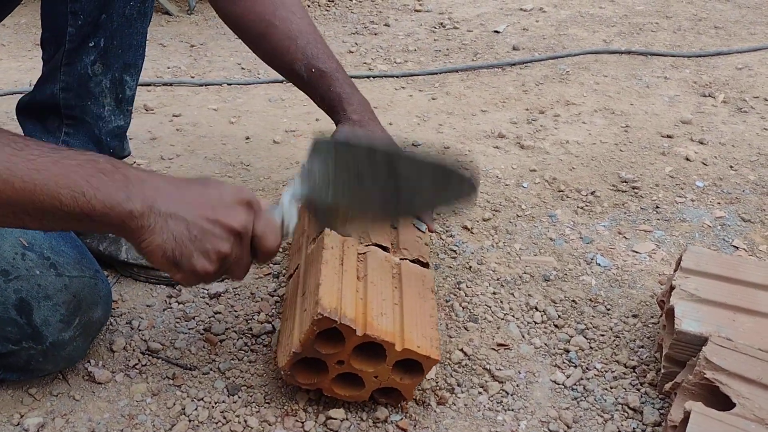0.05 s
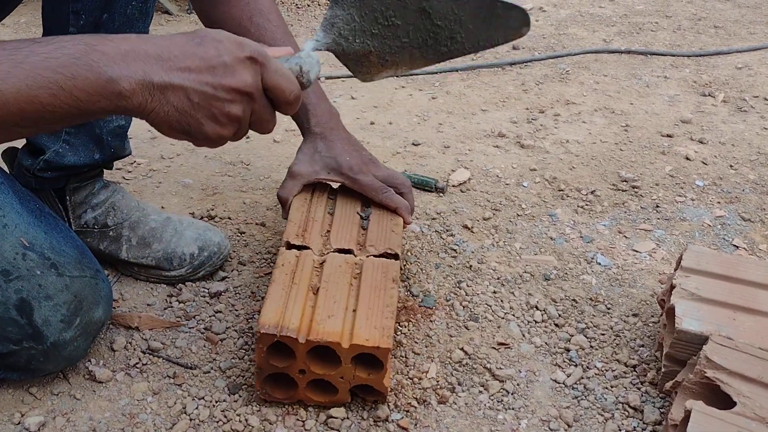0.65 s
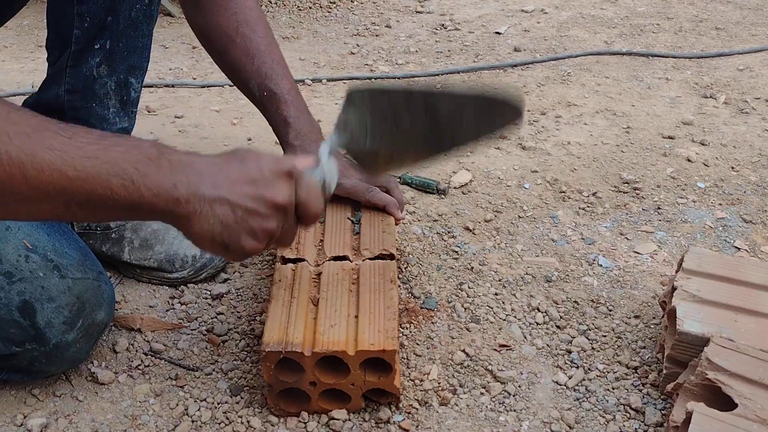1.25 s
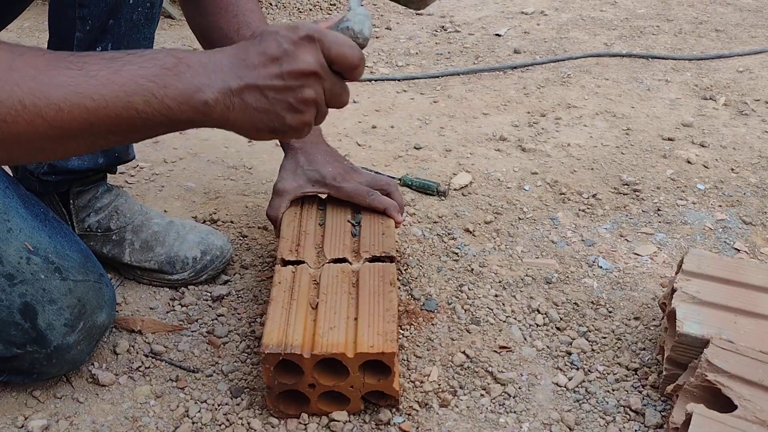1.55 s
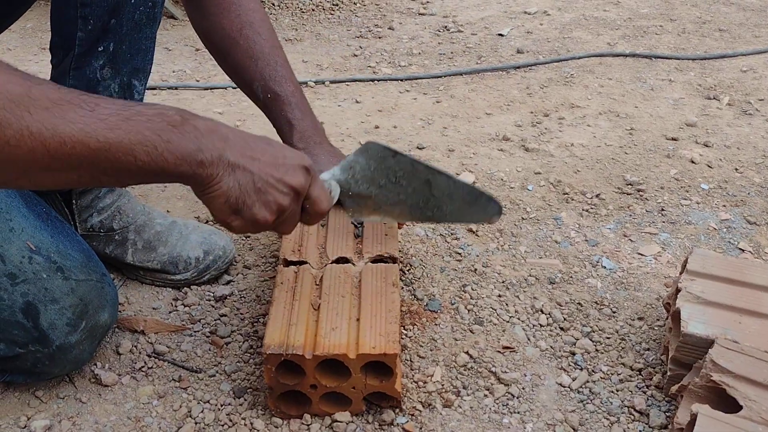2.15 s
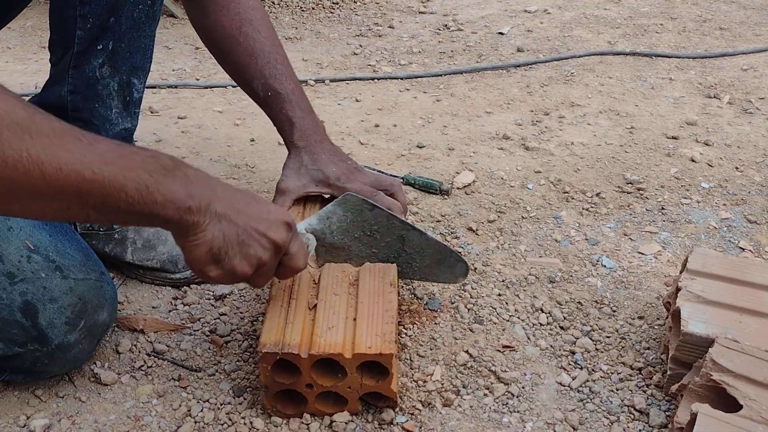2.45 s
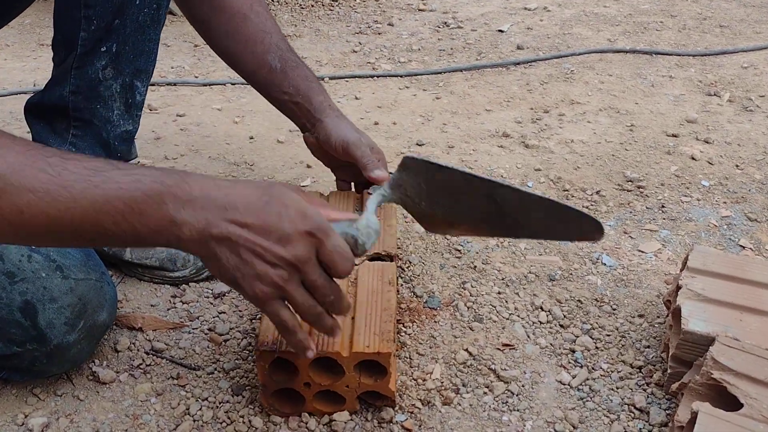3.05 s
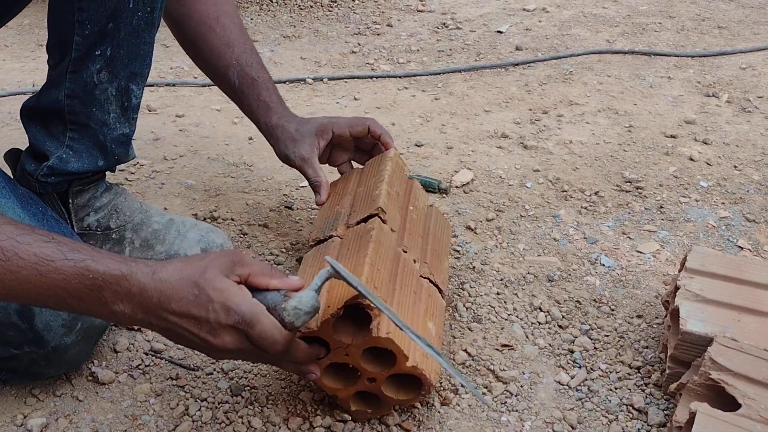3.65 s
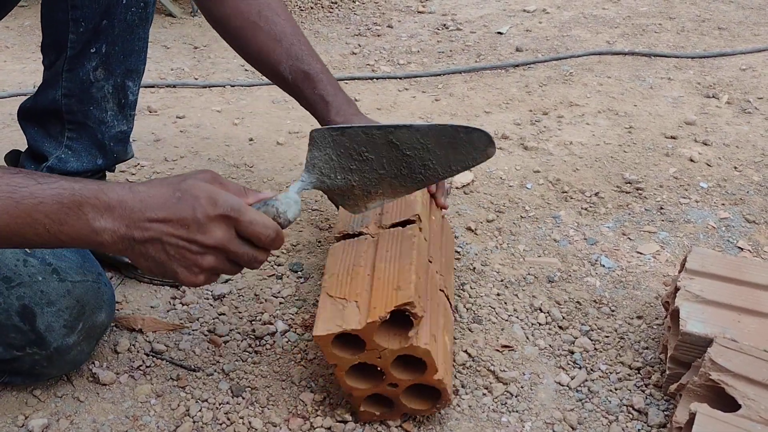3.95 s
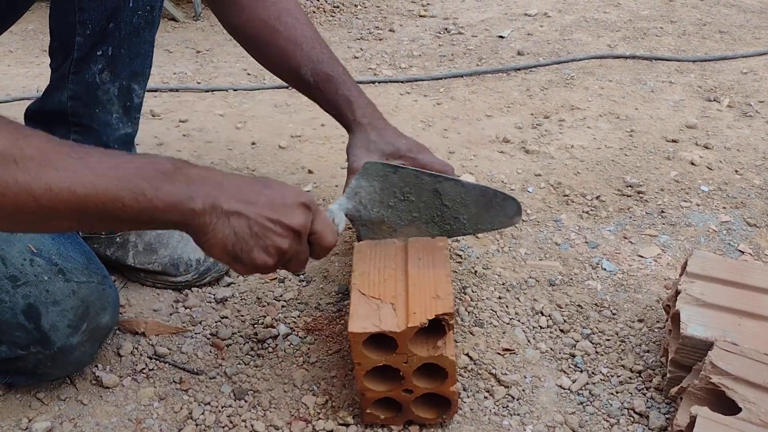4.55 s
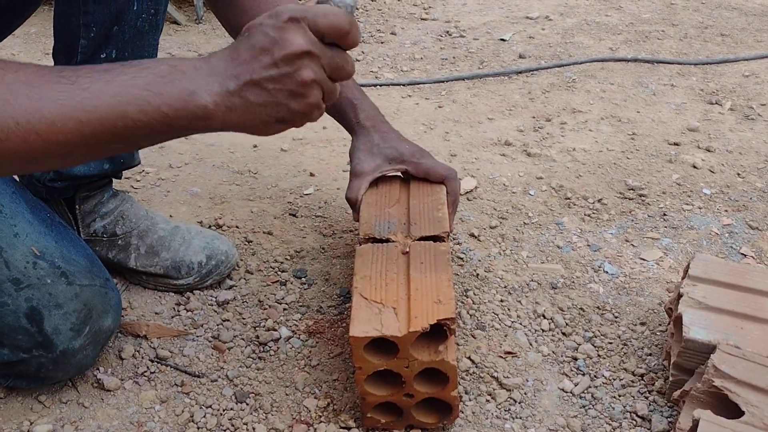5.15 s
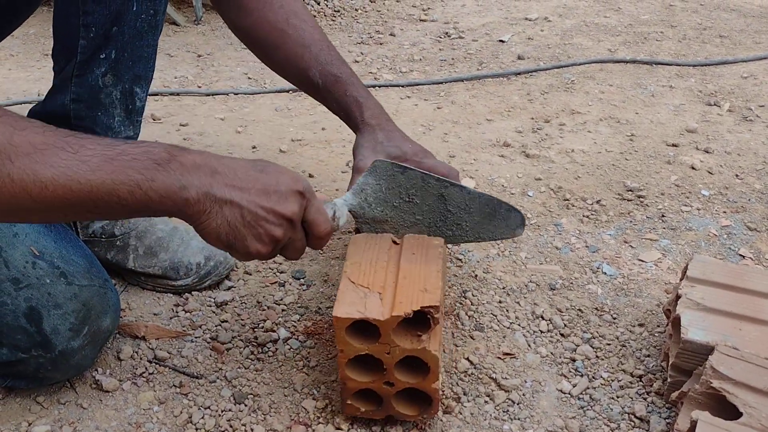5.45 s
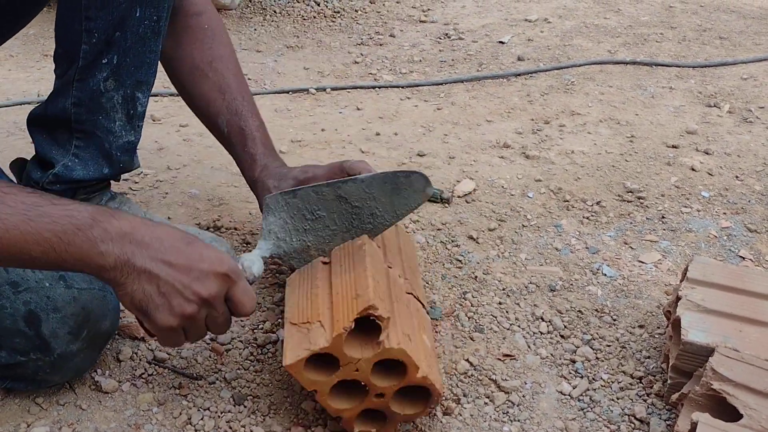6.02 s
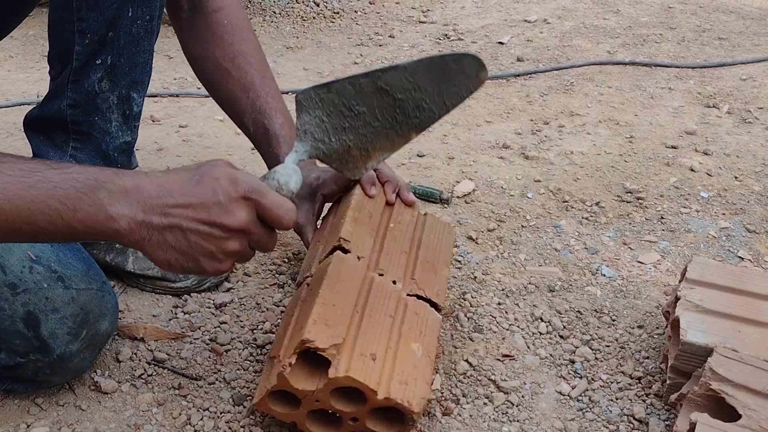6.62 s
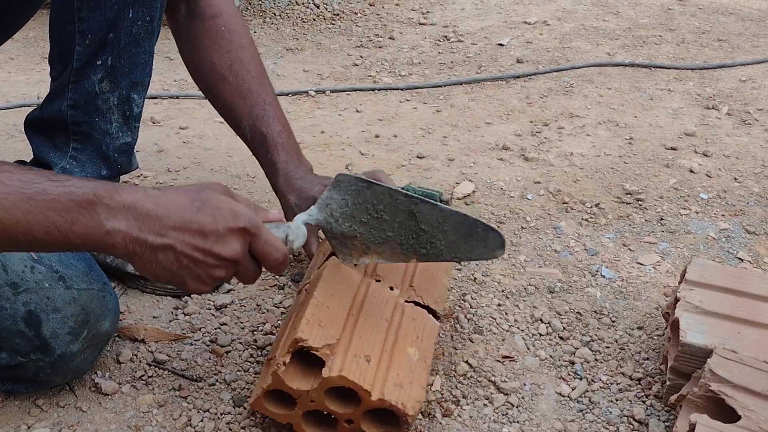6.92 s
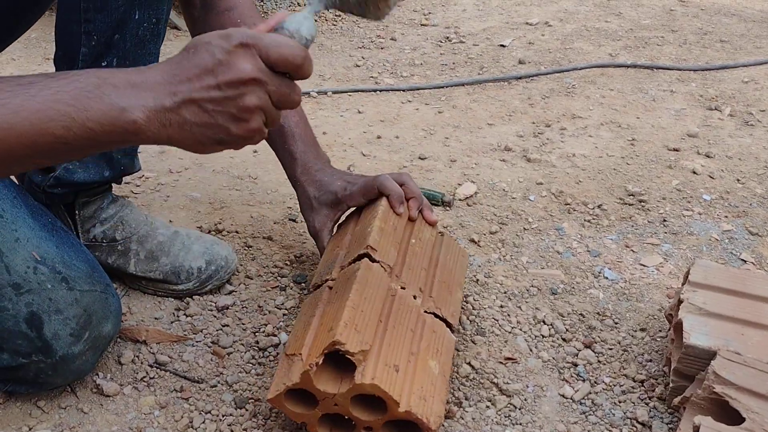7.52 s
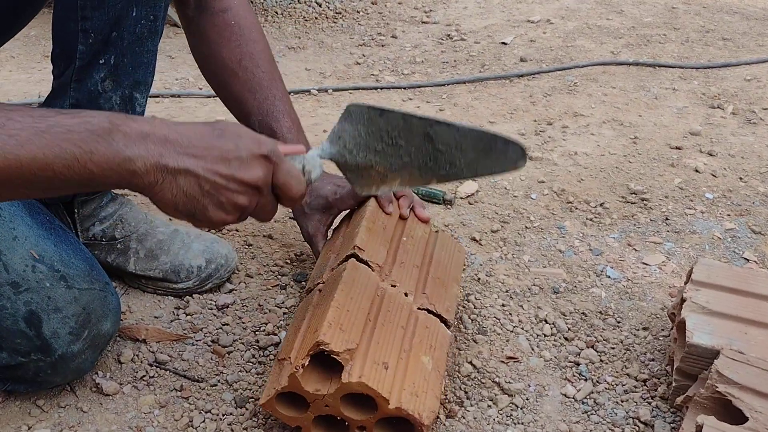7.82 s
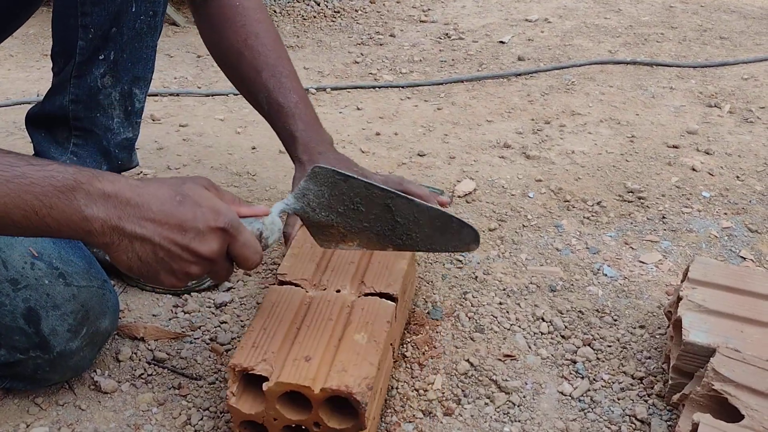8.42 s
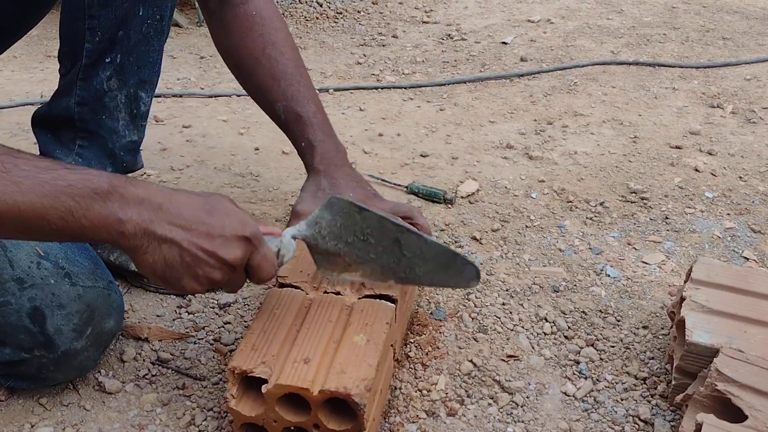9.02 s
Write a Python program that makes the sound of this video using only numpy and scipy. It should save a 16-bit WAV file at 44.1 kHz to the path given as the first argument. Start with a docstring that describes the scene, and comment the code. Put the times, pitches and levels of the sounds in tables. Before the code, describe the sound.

A steel trowel chops at a hollow clay brick in sharp, ringing knocks, with gritty scrapes between rounds, close by outdoors.

```python
"""Sharp, ringing chops of a steel trowel's edge on a hollow clay brick, outdoors, close to a small
stereo microphone. Each blow crushes a little clay, knocks the brick's walls, rings the blade and throws
crumbs; the yard and a far wall answer faintly. Between rounds the mason turns the brick over on gritty
ground. A few blows overload the microphone. Behind it all lie a distant rumble, hiss and thin tones."""
import sys
import numpy as np
from scipy import signal
from scipy.fft import rfft, irfft, next_fast_len
from scipy.io import wavfile
from scipy.ndimage import uniform_filter1d

SR = 44100
rng = np.random.default_rng(int(sys.argv[2]) if len(sys.argv) > 2 else 0)


def to_wav(s):
    """Save 16-bit WAV."""
    ch = np.atleast_2d(s).T  # columns
    pcm = np.round(np.clip(ch, -1, 1) * 32767)  # PCM
    wavfile.write(sys.argv[1], SR, pcm.astype(np.int16))


N = 408807
T = np.arange(SR // 2) / SR  # time axis of one hit
STRIKE_SAMPLES = 1800

# trowel blows and light touches: start_s, knock_db, low_tone_hz, low_tone_db, lower_wall_hz, lower_wall_db,
# upper_wall_hz, upper_wall_db, bite_db, ring_db, clink_hz, clink_db, crush_s
TROWEL_BLOWS = [(0.1643, -40, 419, -39, 1418, -28.5, 1855, -24, -26, -38, 8600, -39, 0.0027),
                (0.429, -63, 436, -72, 1440, -61, 1545, -50.5, -48.5, -60, 7560, -46, 0.0044),
                (0.575, -57, 640, -55, 1100, -55.5, 1980, -56, -52, -43.5, 9370, -45, 0.012),
                (1.0162, -44, 415, -48, 1373, -40, 2130, -32.5, -36, -30.5, 7500, -33.5, 0.0039),
                (1.4037, -35.5, 919, -41, 1410, -32, 1940, -22, -28.5, -31.5, 3780, -25, 0.0041),
                (1.7837, -42.5, 438, -40.5, 1406, -30.5, 1866, -26.5, -26.5, -31, 4820, -37, 0.0024),
                (2.166, -31.5, 435, -35.5, 1176, -37.5, 2034, -26, -28, -28, 3780, -33, 0.0046),
                (2.525, -43, 894, -56, 1183, -30, 1872, -29.5, -29, -45, 9500, -39, 0.0055),
                (2.8852, -32, 429, -40, 1350, -26.5, 1850, -24.5, -29.5, -35, 5850, -32, 0.0083),
                (4.229, -54.5, 800, -51.5, 954, -60, 1987, -43.5, -42, -40, 8360, -40, 0.0044),
                (4.2694, -60, 855, -58, 1023, -62, 1985, -65, -57.5, -59.5, 3320, -56, 0.0043),
                (4.6074, -37.5, 440, -43, 1146, -25.5, 2116, -26.5, -28.5, -33, 4640, -25.5, 0.0023),
                (4.991, -37, 827, -33, 1158, -26, 1747, -23, -29.5, -38.5, 3600, -34, 0.0063),
                (5.375, -36, 836, -34.5, 1213, -32.5, 1814, -22.5, -30.5, -36, 4660, -38, 0.0051),
                (6.4161, -55, 420, -53, 1400, -50, 2090, -49.5, -41.5, -42, 4720, -24.5, 0.0058),
                (6.9187, -45, 433, -38.5, 870, -45, 2310, -49, -51, -37, 3790, -45, 0.0037),
                (6.944, -53.5, 433, -49, 987, -56, 1934, -50, -55.5, -58, 8800, -53, .0033),
                (7.401, -35, 435, -41, 1380, -30, 2050, -29.5, -23.5, -28.5, 9100, -26, 0.0081),
                (7.7973, -39, 840, -48, 1433, -30.5, 2046, -29.5, -26.5, -31.5, 3720, -27, 0.0084),
                (8.1716, -32.5, 807, -53, 1084, -25, 1694, -25, -29, -28.5, 8130, -25, 0.006),
                (8.211, -52, 840, -65, 1210, -47, 1510, -41.5, -46, -66, 7500, -47, 0.01),
                (8.645, -40, 842, -38, 619, -28.5, 1927, -32, -38.5, -35.5, 3290, -33.5, .006),
                (9.0579, -44, 426, -51.5, 1003, -41.5, 1933, -40, -30.5, -43.5, 9700, -43, 0.0036)]
# modes of the steel blade: pitch_hz, level_db, t60_s
BLADE_MODES = [(436, -18, 0.28), (883, -19.5, .17), (1084, -14.5, 0.12), (1420, -17.5, .18),
               (1970, 4.5, .15), (2050, -16, 0.39), (2262, -10, 0.12), (2802, -19, 0.13), (3244, -21, .14),
               (3630, -19.5, 0.17), (3780, -17.5, 0.29), (4330, -22.5, 0.11), (4920, -12.5, 0.086),
               (5950, -19.5, 0.12), (5860, -18, 0.13), (7950, -19.5, 0.12), (8100, -17, .08),
               (8200, -18.5, .1), (9370, -19, 0.082), (9700, -17.5, .1), (9900, -17.5, 0.13)]
# spectra of a blow (knock, two groups of wall modes, crack and fizz of the clay): frequency_hz, gain_db
KNOCK_COLOUR = [(40, -21), (90, 4.5), (170, -6), (250, -1), (340, -5), (450, -2), (620, -0.5), (820, -3.5),
                (1100, -24)]
LOWER_WALL_COLOUR = [(600, -37), (850, -14.5), (1050, -2), (1400, -4.5), (1550, -7), (1900, -40.5)]
UPPER_WALL_COLOUR = [(1200, -37.5), (1480, -9), (1650, -5), (2000, -1), (2170, -18.5), (2300, -4),
                     (2500, -22), (3200, -29.5)]
CRACK_COLOUR = [(1500, -32), (2400, -3.5), (2700, -6.5), (3600, 1.5), (4200, 0.5), (4750, 4), (5300, -0.5),
                (6000, 1.5), (7500, -17.5)]
FIZZ_COLOUR = [(4500, -29), (6100, -2.5), (7300, 3), (8500, 4.5), (10000, 1), (11700, -0.5), (12500, -9),
               (13500, -4), (15700, -11.5), (17000, -24)]
# the loudest chips and pebbles clicking: start_s, tick_db, body_db, left_over_right_db
CHIP_CLICKS = [(0.4607, -53, -57.5, -1), (0.5189, -59, -58.5, 3), (0.555, -60, -53, 2),
               (0.838, -79, -60, -1), (2.0798, -68, -59, -3), (2.3085, -65.5, -67, -8),
               (2.6045, -55.5, -49.5, -1), (3.6712, -47, -41, -1), (4.1185, -55, -59.5, -6.5),
               (5.0683, -47.5, -48, -3), (5.632, -50, -61, -2.5), (5.7104, -59, -56.5, -1),
               (5.8112, -46.5, -49.5, -1.5), (5.9447, -58, -60, -2), (5.9799, -51.5, -55, 2),
               (6.3296, -54, -59, -2), (6.3605, -45, -50, 0), (6.7964, -58, -55.5, 2),
               (7.4823, -50.5, -54.5, -9), (8.331, -47.5, -52, 1), (8.3552, -44, -49, 0.5)]
# the brick rocks or is shoved over grit: peak_s, swell_s, fade_s, grit_db, body_db
BRICK_SHOVES = [(0.215, 0.031, 0.16, -48.5, -40), (1.46, 0.036, .13, -51.5, -48),
                (0.436, 0.033, .08, -50, -50), (0.577, .08, 0.056, -53, -46), (0.97, 0.2, 0.059, -67, -62),
                (3.41, 0.32, 0.16, -68, -55.5), (3.6, 0.23, 0.17, -60.5, -66.5),
                (3.685, 0.051, 0.15, -44.5, -47), (4.13, .15, 0.11, -59.5, -58.5),
                (5.63, 0.049, 0.054, -53.5, -49.5), (5.775, 0.098, 0.037, -55, -50.5),
                (5.891, 0.034, 0.03, -58, -50.5), (6.085, .12, 0.048, -54, -48.5),
                (6.125, .03, .06, -48, -45), (6.18, .04, .08, -52, -45.5), (6.252, .03, 0.056, -49, -51),
                (6.406, .13, 0.069, -44, -41.5), (6.6, 0.16, 0.28, -59, -59.5),
                (6.809, .15, 0.15, -55.5, -56.5), (7.025, .03, .07, -61, -59),
                (8.42, 0.16, 0.14, -54.5, -53), (8.505, 0.043, 0.11, -53.5, -64)]
# spectra of a chip's tick, the clay body and rubbing grit: frequency_hz, gain_db
TICK_COLOUR = [(1500, -42), (3000, -9), (4500, -0.5), (6500, -5), (8400, 2.5), (11000, -1.5),
               (13000, -13.5), (16000, -11)]
CLAY_COLOUR = [(300, -6.5), (700, -11.5), (1100, -8.5), (1600, -2.5), (2000, -4), (2600, -9.5),
               (4000, -18.5)]
GRIT_COLOUR = [(1290, -32), (2200, -1.5), (2970, -7.5), (3220, 2.5), (4380, -7.5), (6420, -0.5), (8580, 0),
               (12700, -4), (14800, -6), (16000, -35)]
# the brick drops on to its side: start_s, level_db, pitch_hz, t60_s
BRICK_DROPS = [(3.67, -31.5, 109, 0.19), (5.633, -39.5, 123, 0.2)]
# slow swings of the overloaded microphone: start_s, left_db
MIC_SWINGS = [(0.165, -30), (1.403, -29), (1.786, -31), (4.606, -35.5), (4.993, -34), (9.057, -28.5)]
# a soft low pop in the microphone: start_s, left_db, right_db
MIC_POPS = [(9.141, -20, -37)]
# the two microphone ports hear less alike towards the treble: frequency_hz, likeness (-1 to 1)
PORT_LIKENESS = [(30, .8), (80, .95), (180, .94), (350, .92), (700, .9), (1400, .85), (2500, .55),
                 (5000, .3), (9000, .1), (16000, .05)]
# how much more the left port hears: frequency_hz, left_over_right_db
PORT_TILT = [(100, -1.5), (500, -0.9), (1200, 1.64), (2200, 2.04), (4300, 0.2), (8000, -1.3), (13000, 1.85)]
# decay of the reflections from the yard nearby and from the far wall: frequency_hz, t60_s
YARD_DECAY = [(100, 0.87), (500, 0.29), (1500, 0.19), (4000, .24), (9000, 0.18), (16000, 0.2)]
FAR_WALL_DECAY = [(100, 0.44), (500, 0.5), (1800, .45), (4000, 0.25), (9000, 0.38), (16000, 0.97)]
# the far wall gives back less of the top treble: frequency_hz, gain_db
FAR_WALL_COLOUR = [(100, -1), (2000, 1), (5000, 2.5), (12000, -8)]
# faint tones from far away: start_s, length_s, pitch_hz, level_db
DISTANT_TONES = [(0.292, 0.25, 580, -56), (2.277, 0.23, 620, -65.5), (5.976, 0.35, 630, -61.5),
                 (6.544, 0.37, 650, -61)]
# spectrum of the open air: frequency_hz, gain_db
AIR_COLOUR = [(12, -24), (20, 1.5), (104, -1.5), (277, -21), (377, -23.5), (624, -20.5), (949, -28.5),
              (1090, -24), (1290, -33.5), (1960, -32.5), (2670, -38), (5680, -42.5), (11100, -41),
              (14700, -43), (16000, -49.5)]
# swell of the distant rumble, taken about its mean: time_s, level_db
RUMBLE_SWELL = [(0.0, -54.5), (1.36, -56.5), (1.61, -51), (2.19, -55), (2.37, -50), (2.6, -50), (2.7, -53),
                (4.26, -58), (4.46, -55), (4.96, -55), (5.27, -50.5), (7.11, -56.5), (8.17, -50.5),
                (8.47, -51.5), (8.8, -56.5), (9.05, -57.5)]


def trowel_blow(knock_db, low_tone_hz, low_tone_db, lower_hz, lower_db, upper_hz, upper_db,
                bite_db, ring_db, clink_hz, clink_db, crush_s):
    """Clay crushes under the edge while the brick's walls ring and the blade rings, with a low tone of its own."""
    bite, crumbling = crushing(crush_s), amp(-13) * onset(0.00097)
    # a glancing blow (much bite, little wall ring) fizzes more and cracks less
    glance_db = bite_db - upper_db
    tilt_db = 1.1 + 0.27 * glance_db
    crack = amp(bite_db - tilt_db) * burst(bite + crumbling * dying(0.087), CRACK_COLOUR)
    fizz = amp(bite_db + tilt_db) * burst(bite + crumbling * dying(0.045), FIZZ_COLOUR)
    knock = amp(knock_db) * burst(dying(0.069), KNOCK_COLOUR)
    lower = amp(lower_db) * brick_wall(lower_hz, LOWER_WALL_COLOUR, t60=0.042, crowd_t60=0.063, crowd_db=3)
    upper = amp(upper_db) * brick_wall(upper_hz, UPPER_WALL_COLOUR,
                                       t60=0.046, crowd_t60=0.067, crowd_db=1.3)
    clink = amp(clink_db) * mode(clink_hz, t60=0.079)
    low_tone = amp(low_tone_db) * mode(low_tone_hz, t60=0.23)
    ring = amp(ring_db) * blade_ring(hardness_db=bite_db - knock_db)
    return crack + fizz + knock + lower + upper + (low_tone + clink) * onset(0.00089) + ring


def crushing(crush_s, rise_s=0.00038, grain_db=-1.0):
    """Force of the edge biting in: a quick rise, a run of tiny fractures, a release."""
    fractures = wobble(len(T), smooth_samples=14)
    return np.minimum(T / rise_s, 1) ** 2 * np.exp(-(T / crush_s) ** 2) * amp(grain_db * fractures)


def brick_wall(hz, spectrum, t60, crowd_t60, crowd_db):
    """A wall of the brick rings with one strong mode amid a crowd of short ones."""
    crowd = burst(dying(crowd_t60), spectrum)
    strong = unit_hit(mode(hz, t60) * onset(0.002))
    return unit_hit(strong + amp(crowd_db) * crowd)


def blade_ring(hardness_db, spot_db=3.0):
    """The steel rings brighter after a hard contact; each spot on the edge favours other overtones."""
    hz, db, t60 = np.transpose(BLADE_MODES)
    spot = np.clip(rng.standard_normal(len(hz)), -1.5, 1.5) * (db < db.max())
    db_per_octave = 0.3778 * (hardness_db - 3.5)
    db = db + db_per_octave * np.log2(hz / 1900) + spot_db * spot
    return sum(amp(d) * mode(f, t) for f, d, t in zip(hz, db, t60)) * onset(0.001)


def crumbs(per_blow=16, flight_s=0.36, below_db=-25, settle_db=-9, clay_db=-3):
    """Each blow throws crumbs that patter down on the brick ever more softly, each at its own pitch."""
    out = np.zeros((2, N))
    t = T[:len(T) // 20]
    for start_s, *_, bite_db, _, _, _, _ in TROWEL_BLOWS:
        for lateness, pitch, smallness, side in rng.random((per_blow, 4)):
            ping = np.sin(2 * np.pi * (3500 + 7000 * pitch) * t) * np.exp(-t / 0.002)
            tick = rng.standard_normal((2, len(t))) * np.exp(-t / 0.001)
            level_db = bite_db + below_db + settle_db * lateness - np.log(smallness + 0.05)
            landing_s = start_s + 0.035 + flight_s * lateness ** 2
            add(out, landing_s, amp(level_db) * (0.4 * ping + tick) * panned(8 * (side - 0.5)))
    return colour(out, TICK_COLOUR) + amp(clay_db) * colour(out, CLAY_COLOUR)


def chip(tick_db, body_db, pan_db):
    """A crumb of clay or a pebble snaps against the brick and tinkles briefly."""
    snap = burst(crushing(0.0022) + amp(-10) * dying(0.11), TICK_COLOUR)
    tinkle = unit_hit(sum(mode(hz, t60=0.054) for hz in rng.uniform(3800, 9000, 3)))
    tick = unit_hit(snap + amp(-5) * tinkle)
    body = burst(dying(0.088), CLAY_COLOUR)
    return (amp(tick_db) * tick + amp(body_db) * body) * panned(pan_db)


def shove(peak_s, swell_s, fade_s, grit_db, body_db, range_db=20, lurch_db=2.5, slip_s=0.0032):
    """Grit crushes and slips under the brick, whose walls colour the rub. Gives start time and sound."""
    t = np.arange(-1.5 * swell_s, 1.5 * fade_s, 1 / SR)
    lurch = wobble(len(t), smooth_samples=600)
    push = amp(lurch_db * lurch - range_db * np.maximum(-t / swell_s, t / fade_s))
    grains = impulses(len(t), per_s=380, spread_db=3, max_spreads=5)
    slips = signal.lfilter([1], [1, -np.exp(-1 / (slip_s * SR))], grains)
    rub = noise(len(t)) * (unit_rms(slips) + 0.55)
    grit = amp(grit_db) * unit_rms(unit_rms(colour(rub, GRIT_COLOUR)) + amp(-5) * pebbles(len(t)))
    body = amp(body_db) * unit_rms(colour(rub, CLAY_COLOUR))
    scrape = (grit + body) * push * signal.windows.tukey(len(t), 0.05)
    return max(peak_s + t[0], 0), scrape * panned(-1.1)


def pebbles(size, per_s=260, count=28):
    """Small stones snap past each other, each with its own brief pitch."""
    out = np.zeros((2, size))
    for hz in np.geomspace(3000, 12000, count) * rng.uniform(0.95, 1.04, count):
        snaps = impulses(size, per_s / count, spread_db=5.5, max_spreads=4)
        ring = mode(hz, t60=0.035)[:, :STRIKE_SAMPLES]
        out += signal.oaconvolve(snaps[None], ring, axes=1)[:, :size]
    return unit_rms(out)


def thud(db, hz, t60):
    """The brick's weight lands on packed earth."""
    earth = burst(dying(0.086), [(40, 2), (130, -2), (220, -3.5), (400, -13), (900, -18), (2500, -44)])
    return amp(db) * (mode(hz, t60) + amp(-8) * earth) * onset(0.0015)


def loose_grit(count=36, level_db=-71, spread_db=8, width_db=10):
    """Single grains give way now and then under the brick, the boot and the knee."""
    out = np.zeros((2, N))
    for when, size, side in rng.random((count, 3)):
        db = level_db + spread_db * (size - 0.5)
        add(out, when * N / SR, chip(db, body_db=db - 1, pan_db=width_db * (side - 0.5)))
    return out


def mic_overload(rebound_s=0.105, right_offset_db=-4.5):
    """The overloaded microphone's resting point dips and rebounds slowly; once it gives a soft pop."""
    out = np.zeros((2, N))
    before, after = np.minimum(T - rebound_s, 0), np.maximum(T - rebound_s, 0)
    rebound = np.exp(-(before / 0.028) ** 2 - after / 0.057)
    dip = np.exp(-(T / 0.04) ** 2)
    swing = (rebound - dip) * onset(0.009)
    pop = onset(0.00082) * np.exp(-(T / 0.16) ** 2)
    for start_s, left_db in MIC_SWINGS:
        add(out, start_s, amp([[left_db], [left_db + right_offset_db]]) * swing)
    for start_s, left_db, right_db in MIC_POPS:
        add(out, start_s, amp([[left_db], [right_db]]) * pop)
    return out


def reflections(x, delay_s, rise_s, decay):
    """Scattered sound reaches the microphone after a delay, each band dying at its own speed."""
    hz, t, bands = signal.stft(noise(len(T)), SR, nperseg=256)
    bands = bands * amp(-60 * t / value_at(decay, hz)[:, None])
    tail = signal.istft(bands, SR, nperseg=256)[1][:, :len(T)] * onset(rise_s)
    tail = np.pad(tail / np.linalg.norm(tail[0]), ((0, 0), (round(delay_s * SR), 0)))
    return signal.oaconvolve(x, tail, axes=1)[:, :N]


def distant_tones(waver=0.023):
    """Thin, slightly wavering tones a long way off."""
    out = np.zeros((2, N))
    for start_s, length_s, pitch_hz, db in DISTANT_TONES:
        size = round(length_s * SR)
        hz = pitch_hz * (1 + waver * wobble(size, smooth_samples=600))
        tone = np.sin(2 * np.pi * np.cumsum(hz) / SR)
        add(out, start_s, amp(db) * tone * signal.windows.tukey(size, 0.5))
    return out


def open_air(level_db=-51.5, rumble_hz=300):
    """Distant outdoor rumble that swells a little, under a steady hiss."""
    time_s, db = np.transpose(RUMBLE_SWELL)
    swell_db = np.interp(np.arange(N) / SR, time_s, db - db.mean())
    wash = amp(level_db) * unit_rms(colour(noise(next_fast_len(N))[:, :N], AIR_COLOUR))
    rumble = signal.sosfilt(signal.butter(1, rumble_hz, fs=SR, output="sos"), wash)
    return wash + rumble * (amp(swell_db) - 1)


def noise(size):
    """White noise as the two ports hear it: alike in the bass, unrelated in the treble."""
    a, b = rfft(rng.standard_normal((2, size)))
    likeness = value_at(PORT_LIKENESS, np.fft.rfftfreq(size, 1 / SR))
    mid, side = a * np.sqrt(1 + likeness), b * np.sqrt(1 - likeness)
    return irfft(np.array([mid + side, mid - side]), size)


def mode(hz, t60):
    """One decaying mode; the ports hear it further apart in phase as its pitch rises."""
    apart = np.arccos(value_at(PORT_LIKENESS, hz)) * np.array([[0.5], [-0.5]]) * rng.choice([-1, 1])
    return np.sin(2 * np.pi * (hz * T + rng.random()) + apart) * dying(t60)


def burst(envelope, spectrum):
    """A hit of coloured noise at unit level."""
    return unit_hit(colour(noise(len(T)) * envelope, spectrum))


def impulses(size, per_s, spread_db, max_spreads):
    """Randomly timed clicks, most small and a few large."""
    heights = amp(spread_db * np.minimum(rng.exponential(1, size), max_spreads))
    return heights * (rng.random(size) < per_s / SR)


def colour(x, spectrum):
    """Causal filter with the given spectrum, so that attacks stay sharp."""
    log_gain = np.log(amp(value_at(spectrum, abs(np.fft.fftfreq(2 ** 12, 1 / SR)))))
    taps = np.fft.ifft(np.exp(np.conj(signal.hilbert(log_gain)))).real[:2 ** 11]
    return signal.oaconvolve(x, taps[None], axes=1)[:, :x.shape[1]]


def wobble(size, smooth_samples):
    return unit_rms(uniform_filter1d(rng.standard_normal(size), size=smooth_samples))


def onset(rise_s):
    return 1 - np.exp(-T / rise_s)


def dying(t60):
    return amp(-60 * T / t60)


def amp(db):
    return 10 ** (np.asarray(db) / 20)


def unit_rms(x):
    return x / np.sqrt(np.mean(x ** 2) + 1e-20)


def unit_hit(x):
    """Unit level over the first 40 ms of a hit."""
    return x / np.sqrt(np.mean(x[..., :STRIKE_SAMPLES] ** 2) + 1e-20)


def value_at(points, hz):
    points_hz, values = np.transpose(points)
    return np.interp(np.log(hz + 1), np.log(points_hz), values)


def panned(left_over_right_db):
    return amp(np.array([[0.5], [-0.5]]) * left_over_right_db)


def add(mix, start_s, sound):
    part = mix[:, round(start_s * SR):][:, :sound.shape[-1]]
    part += sound[..., :part.shape[1]]


def scene(right_lag_samples=2):
    """Blows, chips and shoves close to the microphone, with the yard around and a far wall behind."""
    close = crumbs() + loose_grit()
    for start_s, *row in TROWEL_BLOWS:
        add(close, start_s - 0.0004, trowel_blow(*row))  # the bite peaks at start_s
    for start_s, *row in CHIP_CLICKS:
        add(close, start_s, chip(*row))
    for start_s, *row in BRICK_DROPS:
        add(close, start_s, thud(*row))
    for row in BRICK_SHOVES:
        add(close, *shove(*row))
    yard = amp(-17) * reflections(close, delay_s=0.0074, rise_s=0.0078, decay=YARD_DECAY)
    dulled = colour(close, FAR_WALL_COLOUR)
    far_wall = amp(-25) * reflections(dulled, delay_s=0.07, rise_s=0.0068, decay=FAR_WALL_DECAY)
    left, right = close + yard + far_wall + open_air() + distant_tones() + mic_overload()
    # sound reaches the left port a moment earlier
    return np.array([left, np.pad(right, (right_lag_samples, 0))[:N]])


def record(dry, ceiling=0.75, cutoff_hz=16100):
    """The microphone: each port colours the sound, loud peaks are rounded off, the top treble is cut."""
    left = colour(dry[:1], np.array(PORT_TILT) * [1, 0.5])
    right = colour(dry[1:], np.array(PORT_TILT) * [1, -0.5])
    ports = np.vstack([left, right])
    rounded = ports / (1 + (ports / ceiling) ** 4) ** 0.25
    lowpass = signal.firwin(255, cutoff_hz, window=("kaiser", 9), fs=SR)
    return signal.oaconvolve(rounded, lowpass[None], "same")


dry = scene()
out = record(dry)
to_wav(out)
```